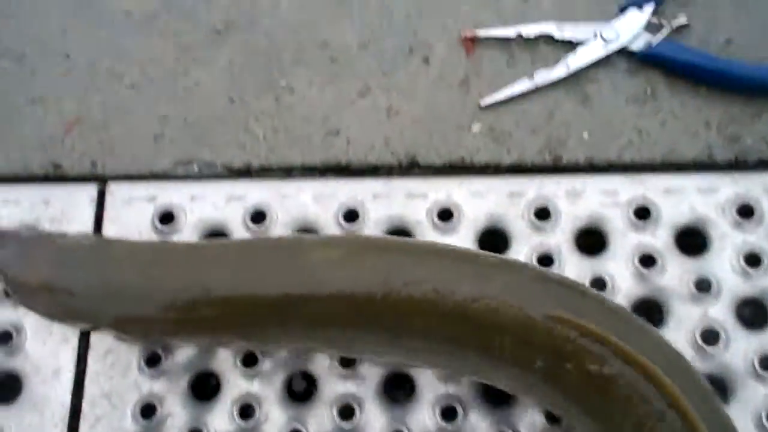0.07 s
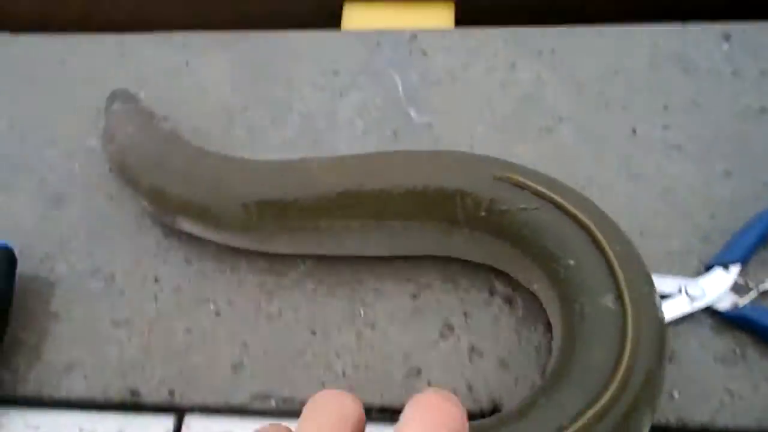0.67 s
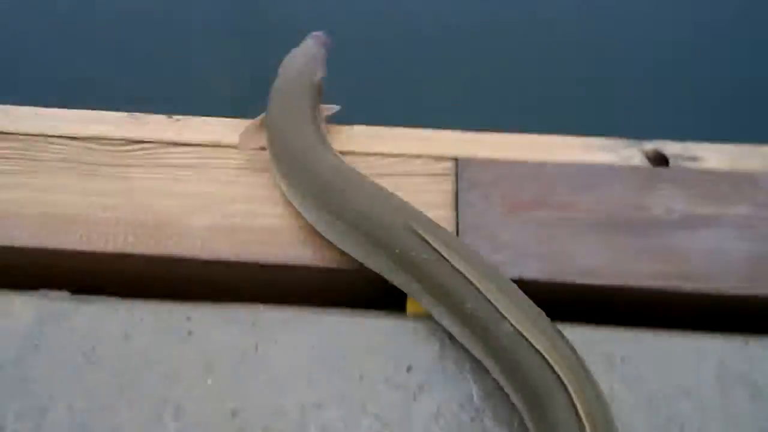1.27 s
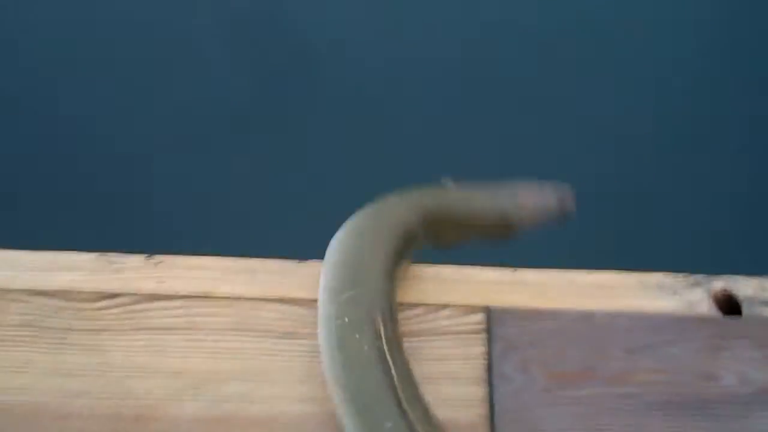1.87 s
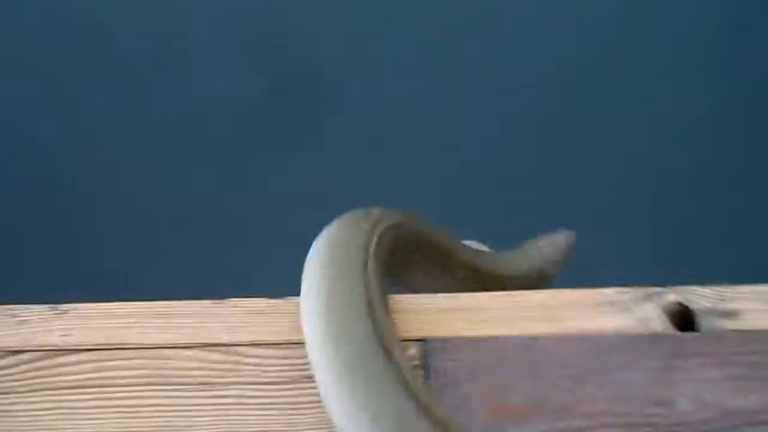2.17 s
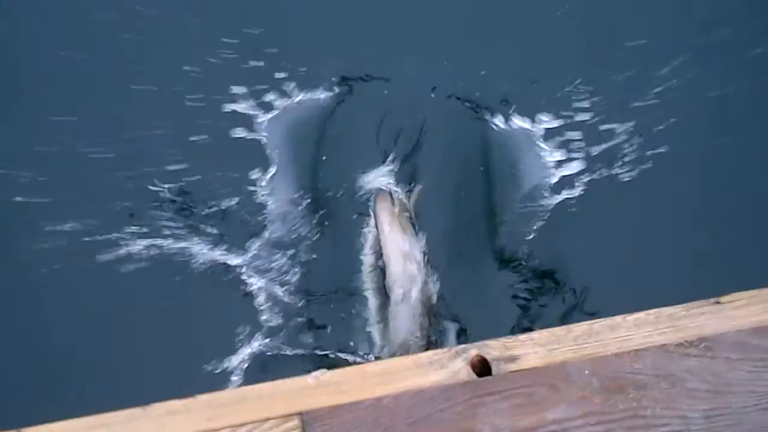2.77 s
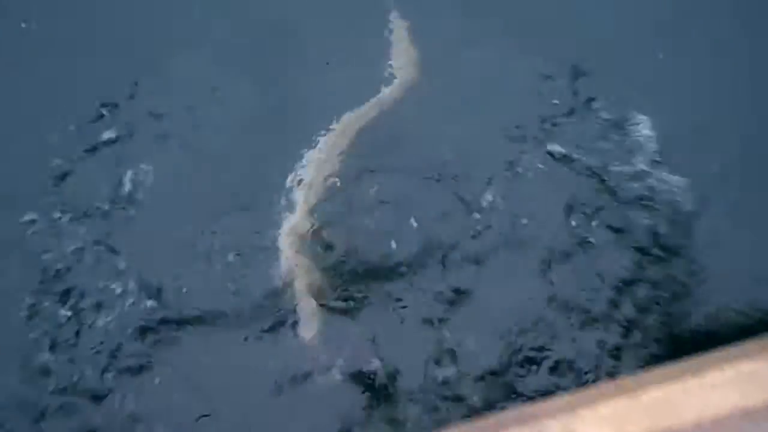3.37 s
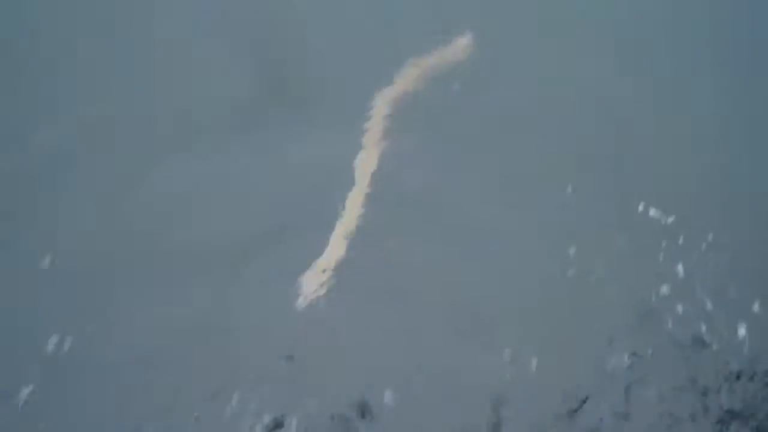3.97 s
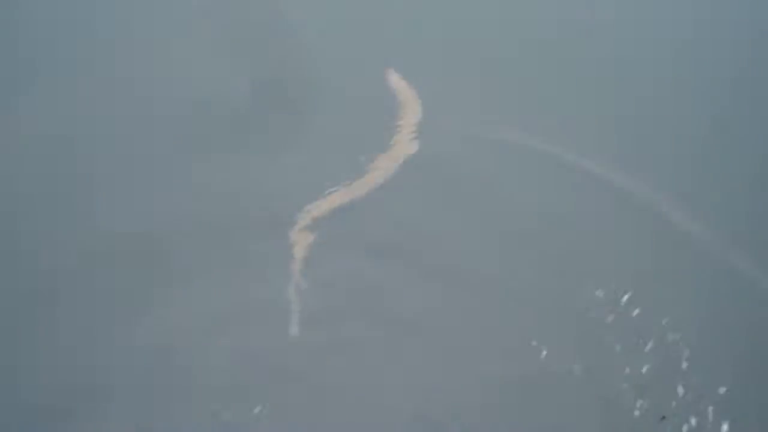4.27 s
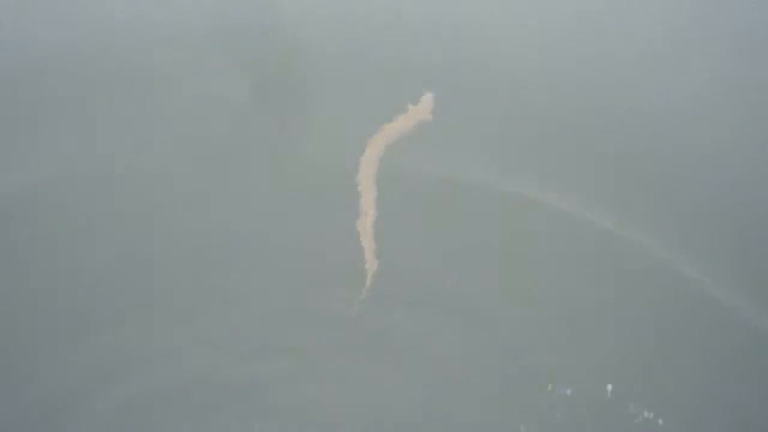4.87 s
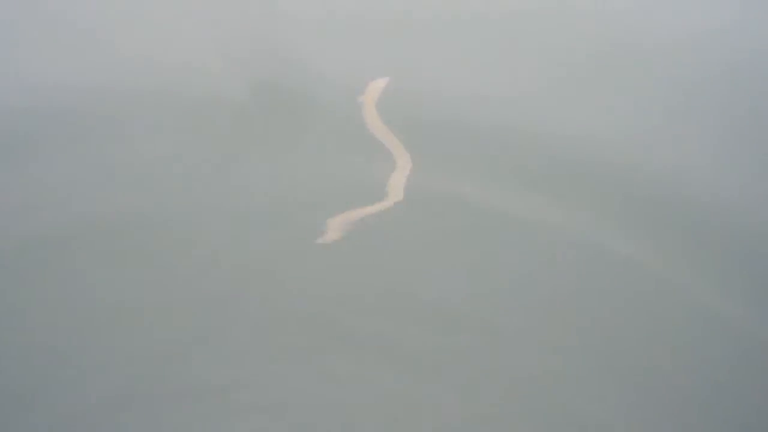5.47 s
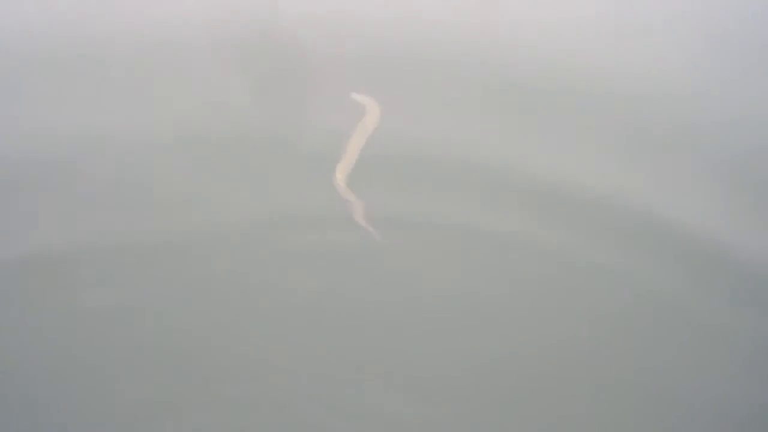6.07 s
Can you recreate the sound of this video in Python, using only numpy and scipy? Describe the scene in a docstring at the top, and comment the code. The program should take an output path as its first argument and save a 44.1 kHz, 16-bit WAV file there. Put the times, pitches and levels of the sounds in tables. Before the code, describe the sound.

A wet eel slides across a wooden dock, its skin rubbing softly while slime crackles and ticks. It scuffs and squeaks briefly at the edge, then hits the water with one sharp, loud splash. Air pockets plop and gulp, spray rains back down, and fine foam fizzes away. Faint ripples lap at the dock over the dull, distant wash of a quiet harbour.

```python
"""A wooden dock in a quiet harbour. A wet eel slithers over the planks: its skin rubs, scuffs and
squeaks while films of slime crackle and tick. It slips off the edge and hits the water with one sharp
splash. Trapped air rings, the cavity behind the body gulps shut, thrown spray rains back and a fine
foam fizzes away. Ripples lap at the dock over a soft harbour wash."""
import sys
import numpy as np
from scipy import signal
from scipy.fft import rfft, irfft
from scipy.io import wavfile
from scipy.ndimage import uniform_filter1d, minimum_filter1d

SR = 44100
rng = np.random.default_rng(int(sys.argv[2]) if len(sys.argv) > 2 else 0)


def log_audio(samples):
    """Write samples as a 16-bit WAV file to the path given in sys.argv[1]."""
    # one column per channel
    frames = np.atleast_2d(samples).T
    # limit to full scale, then quantise
    limited = np.clip(frames, -1, 1)
    pcm = np.round(limited * 32767).astype(np.int16)
    wavfile.write(sys.argv[1], SR, pcm)


N = 269892

# The eel's slide. Each row: time in seconds, relative friction in dB, slime crackle in dB.
SLIDE = [(0.0, -55, -59), (0.41, -59, -59), (0.6, -59, -57), (0.79, -61, -65), (1.06, -61, -65),
         (1.3, -56, -62), (1.63, -54, -60), (1.74, -51, -58), (1.89, -56, -61), (2.13, -56, -61),
         (2.36, -54, -55), (2.62, -54, -55)]
# Tone of skin on wood. Each row: frequency in Hz, relative level in dB.
RUB_COLOUR = [(40, -27.5), (150, -15), (400, -6), (1100, 3), (3000, -0.5), (7300, -2.5), (9500, -9),
              (16000, -15)]
# Tone of the crackle. Each row: grain pitch in Hz, relative level in dB.
SLIME_COLOUR = [(3000, -14.5), (7000, -0.5), (11000, 1), (15500, 4.5)]
def slither(hardest_rub_db=-47.5, rub_exponent=1.35):
    """Skin rubs on the dock while its slime fizzes and sticky threads of it part."""
    friction, slime = gains_in_time(SLIDE)
    rub_gain = from_db(hardest_rub_db) * (friction / friction.max()) ** rub_exponent
    rub = rub_gain * coloured(rng.standard_normal(N), RUB_COLOUR)
    fizz = from_db(-1.5) * grains(SLIME_COLOUR, per_s=9000, cycles=5.4, spread_db=3)
    threads = from_db(.5) * grains(SLIME_COLOUR, per_s=200, cycles=12, spread_db=6, count=10)
    return rub + slime * high_pass(fizz + threads, 2500)


# Drags of the body. Each row: start in seconds, level in dB, t60 in seconds, tilt in dB per octave.
SCUFFS = [(.575, -41, .08, -3), (.608, -44, .17, -4), (.645, -42.5, .04, 0), (.667, -47, .05, -2),
          (.692, -42, .06, -2), (1.606, -51, .3, -5), (1.784, -39, .17, -6), (1.797, -34.5, .027, -1),
          (1.8135, -32, .08, -2.5), (1.838, -37.5, .2, -1), (1.851, -33, .1, 0), (1.882, -40, .04, -2),
          (1.995, -54, .45, -11), (2.193, -43, .035, -7), (2.209, -40, .028, -5), (2.264, -27.5, .026, -.5),
          (2.272, -26.5, .018, 3), (2.345, -46, .22, 4), (2.505, -46, .1, 5)]
# Tone of a scuff. Each row: frequency in Hz, relative level in dB.
SCUFF_COLOUR = [(50, -36.5), (220, -20), (450, -8), (1000, -1.5), (1800, 1.5), (5000, 5.5), (7200, 7),
                (9500, 2.5), (13800, 3.5), (16000, -17.5)]
# Plank resonances. Each row: pitch in Hz, gain in dB against the scuff that drives it.
PLANK_MODES = [(235, 1), (680, 8), (1390, -3), (1770, 1), (4700, -6)]
# Wet skin on the edge. Each row: start in seconds, level in dB, pitch in Hz, glide in octaves per t60.
SQUEAKS = [(1.813, -27.5, 2745, 0), (1.879, -33.5, 6850, -.5)]
def scuffs(rise_share=.04, squeak_t60=.05):
    """The body drags on the planks: the longer the drag, the softer its start; some squeak."""
    rows = [(s, db, rise_share * t60, t60, tilt, PLANK_MODES) for s, db, t60, tilt in SCUFFS]
    out = bursts(rows, SCUFF_COLOUR, rough_db=3, rough_rate=700, ring_q=22)
    for s, db, hz, glide in SQUEAKS:
        add(out, s, from_db(db) * chirp(hz, squeak_t60, glide))
    return out


# Slime films and single drops. Each row: start in seconds, level in dB, pitch in Hz.
TICKS = [(.2077, -27, 10000), (.256, -30, 3600), (.266, -30, 3900), (.3844, -25, 6800), (.4289, -29, 6600),
         (.4471, -13.5, 7200), (.4991, -22, 7400), (.5144, -23, 12600), (.5328, -24, 15000),
         (.5513, -26, 10400), (.6789, -20, 8000), (.7447, -20, 8000), (.829, -36, 3600), (1.096, -31, 6030),
         (1.6607, -24, 12700), (1.724, -24, 2200), (1.7437, -24, 5170), (2.1497, -25, 7100),
         (2.263, -12.5, 3600), (2.356, -25, 14700), (2.3637, -22, 9300), (2.49, -25, 11000),
         (2.7955, -8, 4500), (2.802, -12, 6500), (2.8853, -14, 10600), (2.9372, -14, 5950),
         (3.1147, -11, 10300), (3.2713, -12, 9800), (3.722, -33, 1360), (4.6522, -31, 9200),
         (5.702, -31.5, 2095), (5.702, -27.5, 4300)]
def ticks(ring_t60=.0044, snap_s=.00003, size=1024):
    """A film breaks with one sharp pulse, a very short ring and spatter around the same pitch."""
    out, t = np.zeros(N), np.arange(size) / SR
    for s, db, hz in TICKS:
        snap = from_db(-4) * np.exp(-t / snap_s)
        spatter = rms_one(resonate(rng.standard_normal(size), hz, q=2.2))
        ring = from_db(-7) * np.sin(2 * np.pi * hz * t) + from_db(-9) * spatter
        add(out, s, from_db(db) * high_pass(snap + ring * decay(t, ring_t60), .51 * hz))
    return out


# Head, belly and tail hit the water. Each row: start in seconds, level in dB, rise in seconds,
# t60 in seconds, tilt in dB per octave, ring of the trapped air in Hz.
BODY_SLAPS = [(2.623, -27.5, .0013, .035, 2.5, 700), (2.6276, -17.5, .0006, .022, 2, 13200),
              (2.644, -15, .005, .042, -.8, 2170), (2.651, -15, .006, .058, .3, 4100),
              (2.6583, 0, .0006, .016, .3, 4100)]
# Lumps of water fall back. Each row: start in seconds, level in dB.
LUMPS = [(2.768, -26.5), (2.886, -24.5), (2.9122, -17), (2.922, -21.5), (2.937, -21.5), (2.950, -17.5),
         (2.9730, -19), (2.981, -25), (3.021, -25.5), (3.0745, -21), (3.108, -23.5), (3.188, -29.5),
         (3.250, -29.5), (3.276, -29)]
# Tone of a slap. Each row: frequency in Hz, relative level in dB.
SLAP_COLOUR = [(30, -35), (70, -29.5), (200, -28), (350, -24), (520, -16), (800, -10.5), (2000, 0),
               (4000, -2.5), (7000, 3), (10000, -2), (16000, -2.5)]
def slaps(ring_db=3, lump_rise_s=.0011, lump_t60=.028, lump_tilt=.9, lump_ring_hz=(2500, 7000)):
    """The body, then lumps of thrown water, hit the surface; each traps air that rings."""
    body = [(s, db, rise, t60, tilt, [(hz, ring_db)]) for s, db, rise, t60, tilt, hz in BODY_SLAPS]
    lumps = [(s, db, lump_rise_s, lump_t60, lump_tilt, [(rng.uniform(*lump_ring_hz), ring_db)])
             for s, db in LUMPS]
    return (bursts(body, SLAP_COLOUR, rough_db=2.5, rough_rate=900, ring_q=26)
            + bursts(lumps, SLAP_COLOUR, rough_db=4.5, rough_rate=750, ring_q=26))


# Envelopes of the spray, churn and foam. Each gives: level in dB, time it is reached in seconds,
# attack in seconds, hold in seconds, sag in dB per second, release in seconds.
SPRAY_ENVELOPE = (-36.5, 2.77, .62, .44, 4.5, .72)
CHURN_ENVELOPE = (-44.5, 2.63, .25, .68, 0, .36)
FOAM_ENVELOPE = (-51, 3.5, 1.5, 3, 6.3, 1)
# Tones of the spray and the foam. Each row: grain pitch in Hz, relative level in dB.
SPRAY_COLOUR = [(1800, -12), (2800, 0.5), (4500, -2.5), (7000, 4), (10000, -3), (15500, -5)]
FOAM_COLOUR = [(2800, -16.5), (5200, -14.5), (6800, -5), (10000, -4), (15500, 4)]
def splash():
    """Slaps on the surface, a rain of droplets, churned air and the bursting foam left behind."""
    droplets = grains(SPRAY_COLOUR, per_s=3400, cycles=22, spread_db=6)
    spray = envelope(*SPRAY_ENVELOPE) * high_pass(droplets, 830)
    foam = envelope(*FOAM_ENVELOPE) * grains(FOAM_COLOUR, per_s=13000, cycles=14, spread_db=8.5)
    return high_pass(slaps() + spray + envelope(*CHURN_ENVELOPE) * churn(), 460) + foam


# Tone of churned air. Each row: bubble pitch in Hz, relative level in dB.
CHURN_COLOUR = [(330, -17), (500, -11), (700, -2.5), (1000, 2), (1500, 5.5), (2400, 8), (4500, -3)]
def churn(cycles=52, most_glide=.37, spread_db=6, count=3400):
    """A steady swarm of rising bubbles of all sizes; rms 1."""
    out, lowest, highest = np.zeros(N), CHURN_COLOUR[0][0], CHURN_COLOUR[-1][0]
    for when, pitch, glide_share, strength in rng.random((count, 4)):
        hz = lowest * (highest / lowest) ** pitch
        db = at_hz(CHURN_COLOUR, hz) + spread_db * strength ** 2
        add(out, when * N / SR, from_db(db) * chirp(hz, cycles / hz, most_glide * glide_share))
    return rms_one(high_pass(out, 350))


# Trapped air rings. Each row: start in seconds, level in dB, starting pitch in Hz.
AIR_POCKETS = [(2.542, -37, 980), (2.601, -38, 1200), (2.618, -31, 780), (2.641, -15, 1750),
               (2.757, -26, 1550), (2.7935, -20, 2800), (2.843, -31, 1550), (2.914, -18, 2390),
               (2.952, -20, 1690), (3.02, -40, 560), (3.0314, -25, 4800), (3.061, -16.5, 2500),
               (3.0708, -15, 3530), (3.107, -34, 562), (3.189, -23, 2600), (3.235, -38, 749),
               (3.322, -21.5, 874), (3.385, -44, 960), (3.404, -29, 2350), (4.7028, -41, 1620),
               (4.946, -51, 1110), (4.955, -54, 425), (5.22, -53, 545)]
def plops(cycles=56, glide_octaves=.65, turn_s=2.94, turn_width_s=.06):
    """The large air pockets, heard one by one; the bigger, the longer they ring."""
    out = np.zeros(N)
    for s, db, hz in AIR_POCKETS:
        # Early bubbles fall in pitch as the eel drags them down; later ones rise.
        glide = glide_octaves * np.tanh((s - turn_s) / turn_width_s)
        add(out, s, from_db(db) * high_pass(chirp(hz, cycles / hz, glide), .5 * hz))
    return out


# The cavity behind the body pinches off. Each row: start in seconds, ring level in dB, final pitch in Hz.
GULPS = [(2.768, -26, 820), (2.8016, -22, 797)]
def gulps(t60=.105, swoop_s=.0009, swoop_octaves=1.3, pop_db=5, size=8192):
    """As its neck closes the cavity pops, swoops down in pitch and rings on."""
    out, t = np.zeros(N), np.arange(size) / SR
    neck = np.exp(-t / swoop_s)
    for s, db, hz in GULPS:
        phase = 2 * np.pi * np.cumsum(hz * 2 ** (swoop_octaves * neck)) / SR
        ring = from_db(db + pop_db * neck) * np.sin(phase) * decay(t, t60)
        add(out, s, high_pass(ring, .5 * hz))
    return out


def dock_echo(x, t60=.29, wet_db=-17, size=12000):
    """The side of the dock and the ripples scatter a short faint tail."""
    tail = rng.standard_normal(size) * decay(np.arange(size) / SR, t60)
    return x + from_db(wet_db) * signal.fftconvolve(x, tail / np.sqrt(np.sum(tail ** 2)))[:N]


# Swell of the ripples. Each row: time in seconds, level in dB.
LAPPING = [(3.4, -63.5), (4.15, -69), (4.22, -56.5), (4.32, -72), (4.9, -75), (5.25, -66.5), (5.45, -76),
           (6.12, -69.5)]
# Tone of the ripples. Each row: grain pitch in Hz, relative level in dB.
LAPPING_COLOUR = [(280, -0.5), (550, 0), (1300, 0)]
def lapping():
    """Ripples lap at the dock in soft swells of low bubbles."""
    swell, = gains_in_time(LAPPING)
    return swell * grains(LAPPING_COLOUR, per_s=200, cycles=25, spread_db=2.5, count=14)


# Tone of the background bed. Each row: frequency in Hz, relative level in dB.
HARBOUR_COLOUR = [(25, -26.5), (60, -10), (130, -6), (280, -1.5), (500, 1), (1100, -2.5), (2000, -7.5),
                  (4000, -14.5), (9000, -18), (16000, -17)]
def harbour(level_db=-60, waver_db=.5):
    """A dull, distant wash whose level wavers slightly."""
    wash = rng.standard_normal(N) * from_db(waver_db * drift(9, N))
    return from_db(level_db) * coloured(wash, HARBOUR_COLOUR)


def bursts(rows, colour, rough_db, rough_rate, ring_q, size=16384):
    """Each contact swells and dies as a ragged rush of tiny impacts, which also drives its resonances."""
    out, t = np.zeros(N), (np.arange(size) - size // 4) / SR
    for s, db, rise, t60, tilt, modes in rows:
        swell = np.exp(-(np.minimum(t, 0) / rise) ** 2) * decay(np.maximum(t, 0), t60)
        ragged = rng.standard_normal(size) * from_db(rough_db * drift(rough_rate, size))
        rush = coloured(ragged, colour, tilt)
        ring = sum(from_db(mode_db) * resonate(rush, hz, ring_q) for hz, mode_db in modes)
        add(out, s + t[0], from_db(db) * swell * (rush + ring))
    return out


def grains(colour, per_s, cycles, spread_db, count=28):
    """Tiny bubbles born at random, each ringing for some cycles at one of count pitches; rms 1."""
    sizes = from_db(spread_db * np.minimum(rng.exponential(1, N), 3)) * rng.choice([-1, 1], N)
    clicks = sizes * (rng.random(N) < per_s / SR)
    out, pitch_index = np.zeros(N), rng.integers(0, count, N)
    for k, hz in enumerate(np.geomspace(colour[0][0], colour[-1][0], count)):
        radius, angle = decay(1 / SR, cycles / hz), 2 * np.pi * hz / SR
        births = clicks * (pitch_index == k) + 1e-18 * sizes
        rings = signal.lfilter([1, -1], [1, -2 * radius * np.cos(angle), radius ** 2], births)
        out += from_db(at_hz(colour, hz)) * rms_one(rings)
    return rms_one(out)


def chirp(hz, t60, glide, attack_s=.0007):
    """A dying sine that glides by some octaves per t60: the ring of an air pocket, or a squeak."""
    t = np.arange(int(t60 * SR) + 1) / SR
    phase = 2 * np.pi * np.cumsum(hz * 2 ** (glide * t / t60)) / SR
    return np.sin(phase) * (1 - np.exp(-t / attack_s)) * decay(t, t60)


def envelope(db, full_s, attack_s, hold_s, sag_db_per_s, release_s):
    """A gain that climbs 60 dB in the attack, then sags, and loses 60 dB more over the release."""
    t = np.arange(N) / SR - full_s
    fade = np.maximum(-t, 0) / attack_s + np.maximum(t - hold_s, 0) / release_s
    return from_db(db - sag_db_per_s * np.maximum(t, 0) - 60 * fade)


def gains_in_time(rows):
    """One gain curve per dB column, silent outside the rows."""
    s, *columns = np.transpose(rows)
    return [from_db(np.interp(np.arange(N) / SR, s, db, left=-120, right=-120)) for db in columns]


def coloured(x, spectrum, tilt=0):
    """Shape a signal by a spectrum and a slope in dB per octave; rms 1."""
    hz = np.maximum(np.arange(len(x) // 2 + 1) * SR / len(x), 1)
    octaves = np.log2(np.maximum(hz, 250))
    return rms_one(irfft(rfft(x) * from_db(at_hz(spectrum, hz) + tilt * octaves), len(x)))


def at_hz(points, hz):
    """Read a spectrum on a log-frequency axis."""
    return np.interp(np.log(hz), *np.transpose([(np.log(f), db) for f, db in points]))


def drift(rate, size):
    """A random wander of spread about 1, turning rate times a second."""
    return np.interp(np.arange(size) * rate / SR, np.arange(size), rng.standard_normal(size))


def resonate(x, hz, q):
    """The band that one resonance passes."""
    return signal.lfilter(*signal.iirpeak(hz, q, fs=SR), x)


def high_pass(x, hz):
    """Small sources radiate little bass."""
    return signal.sosfilt(signal.butter(3, hz, "high", fs=SR, output="sos"), x)


def decay(t, t60):
    """A gain that falls 60 dB every t60 seconds."""
    return np.exp(-np.log(1000) * t / t60)


def from_db(db):
    """Decibels to gain."""
    return 10 ** (np.asarray(db) / 20)


def rms_one(x):
    """Scale to unit rms."""
    return x / np.sqrt(np.mean(x ** 2) + 1e-20)


def add(out, s, sound):
    """Mix a sound in at a time."""
    start = int(s * SR)
    out[start:start + len(sound)] += sound[:N - start]


def scene():
    """The eel and its splash echo off the dock, over a soft harbour bed."""
    bed = harbour() + lapping()
    eel = slither() + scuffs() + ticks() + plops() + gulps() + splash()
    return (dock_echo(eel) + bed)[None]


def record(dry, ceiling=.72, window=24, unevenness=.028, cutoff_hz=15900):
    """A small microphone with a narrow treble dip; a fast limiter holds the peaks and the top is cut."""
    heard = dry - .87 * resonate(dry, hz=8590, q=19)
    allowed_gain = ceiling / np.maximum(np.abs(heard), ceiling)
    held = heard * uniform_filter1d(minimum_filter1d(allowed_gain, window), window)
    # The diaphragm yields more one way, so the loudest slap leaves a faint thud.
    lopsided = held - unevenness * held ** 2
    return signal.sosfilt(signal.ellip(10, .2, 80, cutoff_hz, fs=SR, output="sos"), lopsided)


dry = scene()
out = record(dry)
log_audio(out)
```